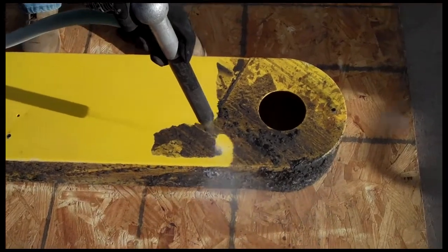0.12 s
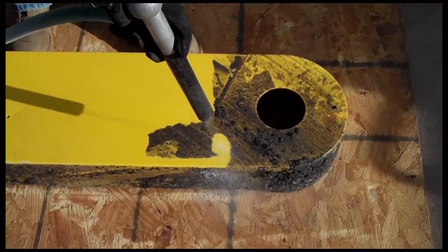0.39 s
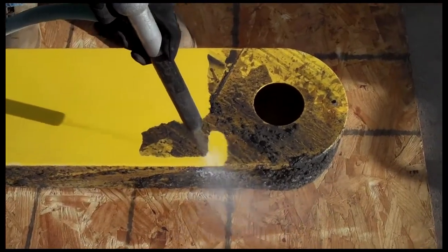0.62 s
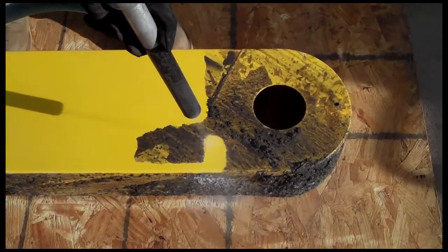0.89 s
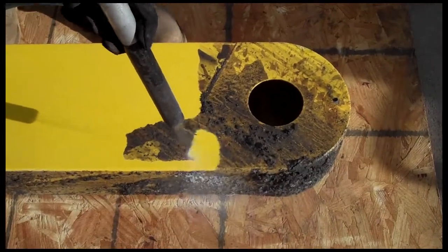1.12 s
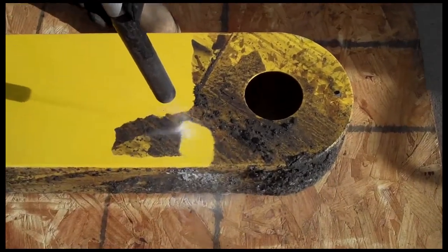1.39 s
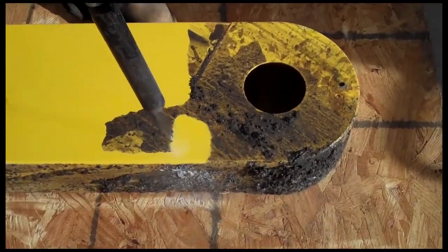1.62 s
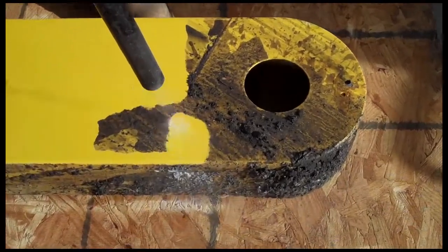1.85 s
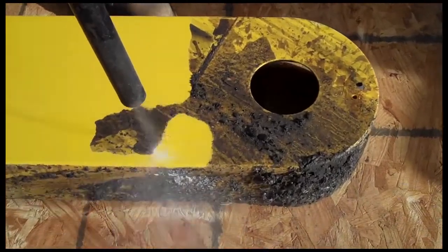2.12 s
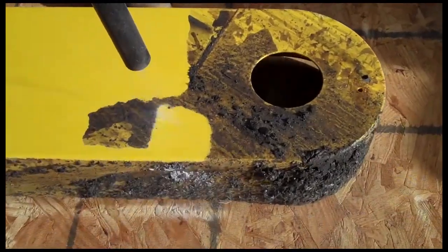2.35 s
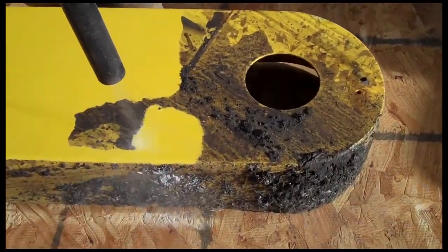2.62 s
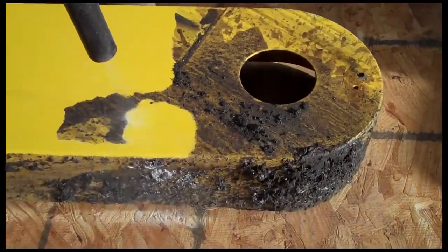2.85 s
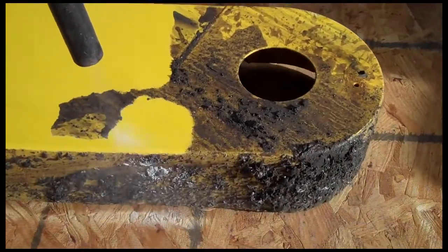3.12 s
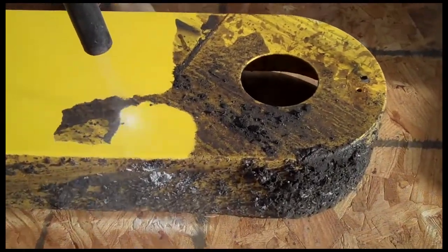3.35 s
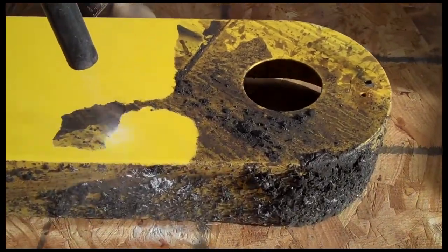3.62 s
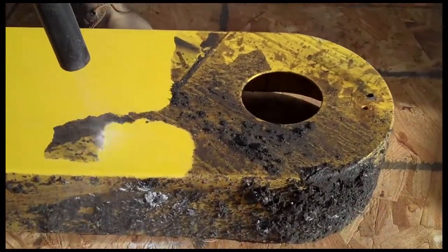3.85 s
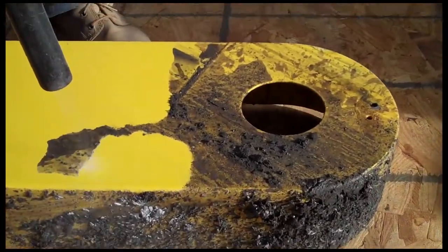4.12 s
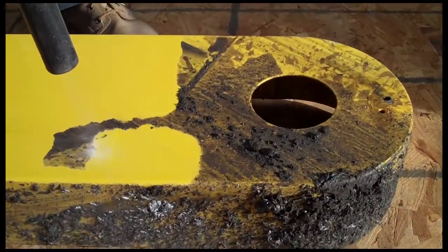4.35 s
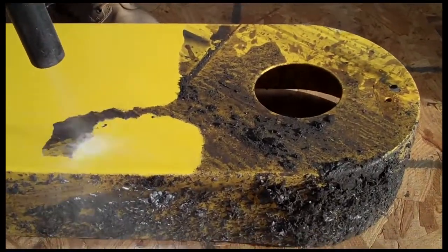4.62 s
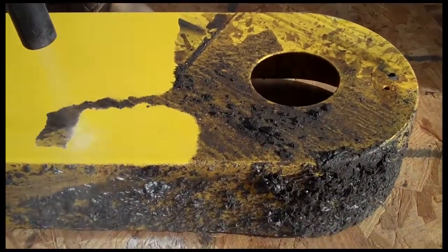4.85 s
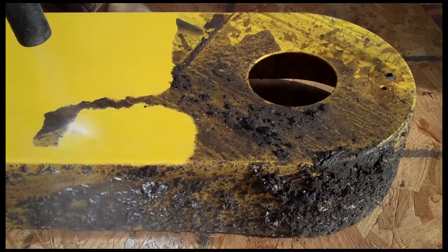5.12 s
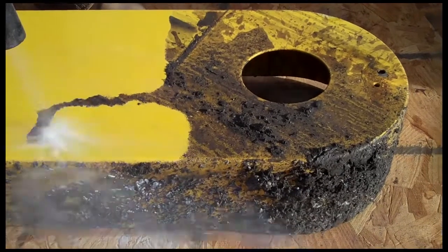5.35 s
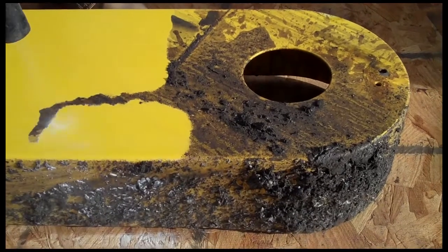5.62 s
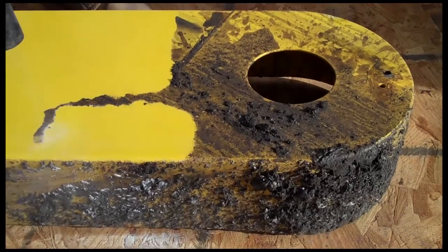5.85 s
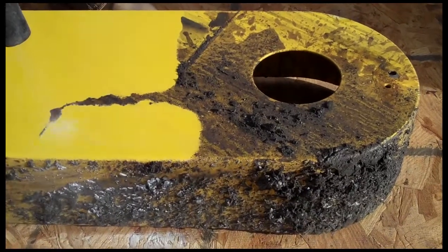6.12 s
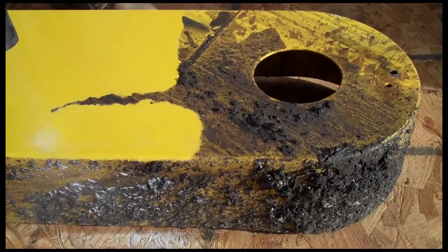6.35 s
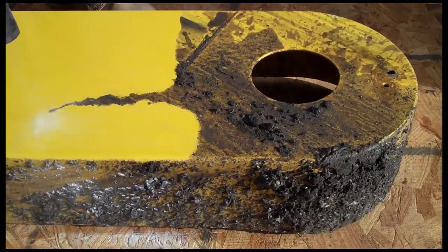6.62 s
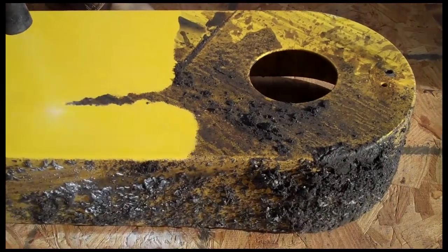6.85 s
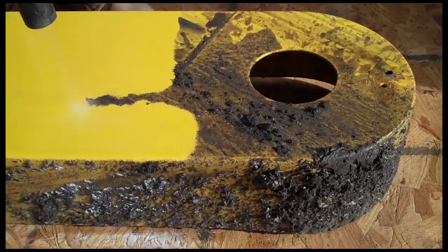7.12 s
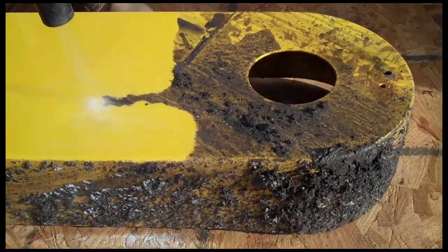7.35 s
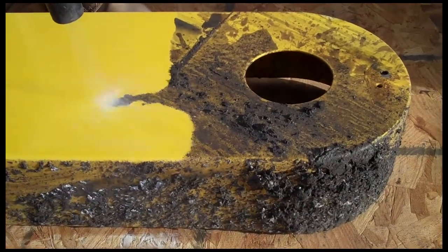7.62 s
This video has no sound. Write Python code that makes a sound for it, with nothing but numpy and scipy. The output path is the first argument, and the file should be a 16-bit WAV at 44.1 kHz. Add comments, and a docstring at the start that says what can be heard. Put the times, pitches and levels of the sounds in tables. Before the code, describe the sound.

A loud, unbroken dry ice blasting hiss roars in a workshop, pulsing about twice a second as pellets drum a ringing steel part.

```python
"""In a workshop, a hand-held nozzle blasts air and dry ice pellets at a steel part, sweeping about twice a second.
The jet is shaped noise that hisses; the pellets are random blows that drum on three resonances of the steel.
The walls return a wide roar, made of noise nearly unrelated at the two ports.
The nozzle drifts to the left of a close pair of microphone ports and eases back a little at the end."""
import sys
import numpy as np
from scipy import signal
from scipy.fft import rfft, irfft
from scipy.io import wavfile
from scipy.ndimage import uniform_filter1d, map_coordinates

SR = 44100
rng = np.random.default_rng(int(sys.argv[2]) if len(sys.argv) > 2 else 0)


def generate_wav(signal):
    """Clip the signal to [-1, 1] and save it as 16-bit WAV at the path in sys.argv[1]."""
    frames = np.transpose(np.atleast_2d(signal))
    scaled = np.clip(frames, -1, 1) * 32767
    pcm = np.round(scaled).astype(np.int16)
    wavfile.write(sys.argv[1], SR, pcm)


def ratio_of_db(decibels):
    """Turn decibels (scalar or array-like) into linear amplitude factors; 0 dB maps to 1."""
    return 10 ** (np.asarray(decibels, float) / 20)


N = 340893

# The nozzle's drift: start_s, left_lead_us, jet_brightness_db_per_octave, jet_level_db,
# jet_rise_in_pass_db, room_level_db
NOZZLE_DRIFT = [(0, -4, 2, -16, -0.5, -14), (0.7, -1, 1.5, -15, -1.5, -13), (2, 8.5, 0.6, -15, 0, -14.5),
                (3, 15, 0.2, -15.5, 0.2, -14.5), (4.2, 23.5, -0.1, -16, 2.3, -14.5),
                (5.3, 28, -0.2, -16.5, 0.5, -14.5), (6.3, 29.5, -0.8, -16, 0.5, -14.5),
                (6.9, 31, 0.1, -16.5, -2, -15), (7.3, 27, 0, -14.5, -1.8, -15),
                (7.73, 25, 2.5, -16, -0.5, -14)]
# Colour of the jet's hiss: freq_hz, relative_level_db (per Hz)
JET_SPECTRUM = [(300, -32), (1000, -14), (2000, -3.5), (3500, 2.5), (5000, 0), (6500, -2.5), (8000, -3.5),
                (10500, -7), (12000, -15.5), (14000, -22.5)]
# Colour of the room's roar: freq_hz, relative_level_db (per Hz)
ROAR_SPECTRUM = [(25, -39), (60, -13.5), (150, -9), (400, -1.5), (1000, 1), (2000, 1), (3500, 0), (5000, 0),
                 (7000, -4), (9000, -12.5), (10500, -22.5), (14500, -25)]
# Lower, upper and middle ring of the steel: pitch_hz, width_hz (of one of two equal filters in a row)
STEEL_RINGS = [(3190, 1470), (4510, 810), (4040, 470)]
# The solid body between the ports: freq_hz, left_phase_lead_rad, left_minus_right_db
PORT_BODY = [(1000, -2, 4), (3080, 0.76, 1.5), (4180, -0.13, 2.3), (6500, 0, -6), (7840, .5, -4),
             (9930, 1.4, -6.5), (11300, 1.97, -2.5), (14600, 2, 12.5)]
# Passes over the crusted spot: middle_s, length_s, lower_ring_db, upper_ring_db, middle_ring_db
PASSES = [(0.055, 0.2, -16, -30, -27), (0.26, 0.71, -16.5, -16.5, -35), (0.71, 0.55, -14, -12.5, -24),
          (1.185, 0.49, -17.5, -17, -20), (1.677, .56, -17, -16.5, -22), (2.13, 0.41, -15, -15, -21),
          (2.627, 0.51, -19.5, -20.5, -23.5), (3.08, 0.27, -20, -28, -22), (3.553, 0.64, -20, -33, -26),
          (4.045, 0.52, -19.5, -25, -22.5), (4.57, .45, -20.5, -21, -21), (4.98, 0.7, -20, -25, -27),
          (5.46, 0.4, -21, -22, -21), (5.973, 0.37, -21, -22, -25), (6.434, .3, -19, -25, -31),
          (6.617, .25, -19, -19, -27), (7.13, 0.55, -36, -29, -32), (7.46, .4, -19.5, -20.5, -25)]
# The patter between passes, one value for each steel ring: level_db
PATTER_DB = [-28, -26, -35]
# How long after the middle of a pass each steel ring peaks (negative is before): lag_s
RING_LAG_S = [0.0067, -0.0089, .015]
# Share of a pass's length over which each steel ring swells: span (ratio)
RING_SPAN = [1.07, 0.83, 0.99]

PELLETS_PER_S = 9000
RING_FLICKER_DB, FLICKERS_PER_S = 0.64, 14
# Left minus right level, and its change with the left port's lead
DIRECT_PAN_DB, DIRECT_PAN_DB_PER_US = 2, -0.0648
ROOM_PAN_DB, ROOM_PAN_DB_PER_US = 2.8, -0.08
# A band of the direct sound, slightly weak at first, that grows into a lift as the nozzle drifts left
BAND_LIFT_HZ, BAND_LIFT_WIDTH_HZ, BAND_LIFT_DB, BAND_LIFT_DB_PER_US = 5800, 750, -1.5, 0.1074
ROAR_SWELL_DB = 0.82  # the room's rise in a pass
# The whole blast sputters, more as the nozzle drifts left
SPUTTER_DB, SPUTTER_DB_PER_US, SPUTTERS_PER_S = 0.17, 0.0188, 28
FRAME = 512  # samples in a spectral frame
TOP_HZ, BASS_CUT_HZ = 14200, 34


def jet():
    """Turbulent mixing noise of the air jet, brighter when it points nearer."""
    jet_db, rise_db = curves(NOZZLE_DRIFT, np.arange(N) / SR)[2:4]
    hiss_db = jet_db + rise_db * swells().sum(axis=0)

    def colour(hz, t):
        brightness = curves(NOZZLE_DRIFT, t)[1]
        tilt = ratio_of_db(brightness * np.log2((hz + 500) / 6500))
        return ratio_of_db(along(JET_SPECTRUM, hz)[0]) * tilt * patches(hz, t, patchy_db=0.82)

    hiss = unit(reshaped(rng.standard_normal(N), colour))
    return ratio_of_db(hiss_db + 0.38 * wobble(25)) * hiss


def pellets():
    """A dense hail of tiny blows, arriving in clumps, drives three broad resonances of the steel."""
    hit = rng.random(N) < PELLETS_PER_S / SR
    clumps = ratio_of_db(0.5 * wobble(20) + 0.8 * wobble(50))
    hail_spectrum = rfft(hit * rng.standard_normal(N) * clumps)
    hz = np.fft.rfftfreq(N, 1 / SR)
    rings = []
    for pitch_hz, width_hz in STEEL_RINGS:
        damping = 1j * hz * width_hz
        resonance = damping / (pitch_hz ** 2 - hz ** 2 + damping)
        rings.append(unit(irfft(hail_spectrum * resonance ** 2, N)))
    flicker = np.array([wobble(FLICKERS_PER_S) for _ in STEEL_RINGS])
    ring_db = drumming_db() + RING_FLICKER_DB * flicker
    return np.sum(ratio_of_db(ring_db) * rings, axis=0)


def drumming_db():
    """Level of each steel ring: the passes swell over a steady patter, added as power."""
    peaks_db = np.transpose(PASSES)[2:]
    power = []
    for patter_db, peak_db, lag_s, span in zip(PATTER_DB, peaks_db, RING_LAG_S, RING_SPAN):
        power.append(ratio_of_db(2 * patter_db) + ratio_of_db(2 * peak_db) @ swells(lag_s, span))
    return 10 * np.log10(power)


def at_ports(direct):
    """A direct sound reaches the two ports with a lead and a level difference, half on each side."""
    def gains(hz, t):
        lead_us = curves(NOZZLE_DRIFT, t)[0]
        pan_db = DIRECT_PAN_DB + DIRECT_PAN_DB_PER_US * lead_us
        body_phase, body_db = along(PORT_BODY, hz)
        phase = body_phase + 2 * np.pi * hz * lead_us / 1e6
        left = ratio_of_db((pan_db + body_db) / 2) * np.exp(0.5j * phase)
        band = np.exp(-((hz - BAND_LIFT_HZ) / BAND_LIFT_WIDTH_HZ) ** 2)
        band_lift = ratio_of_db((BAND_LIFT_DB + BAND_LIFT_DB_PER_US * lead_us) * band)
        return band_lift * np.array([left, 1 / left])

    return reshaped(direct, gains)


def room():
    """The walls return the blast from all sides: nearly unrelated at the two ports."""
    lead_us, *_, steady_db = curves(NOZZLE_DRIFT, np.arange(N) / SR)
    roar_db = steady_db + ROAR_SWELL_DB * swells().sum(axis=0) + 0.13 * wobble(8)
    pan_db = ROOM_PAN_DB + ROOM_PAN_DB_PER_US * lead_us
    # each port has its own noise, plus a little that both share
    noise = rng.standard_normal((2, N)) + 0.42 * rng.standard_normal(N)

    def colour(hz, t):
        return ratio_of_db(along(ROAR_SPECTRUM, hz)[0]) * patches(hz, t, patchy_db=0.5)

    roar = unit(reshaped(noise, colour))
    return ratio_of_db(roar_db + np.outer([0.5, -0.5], pan_db)) * roar


def swells(lag_s=0, span=1):
    """One raised cosine, 0 to 1, for every pass."""
    middle_s, length_s = np.transpose(PASSES)[:2, :, None]
    position = (np.arange(N) / SR - lag_s - middle_s) / (span * length_s)
    return np.cos(np.pi * np.clip(position, -0.5, 0.5)) ** 2


def patches(hz, t, patchy_db):
    """Turbulence: random gain, smooth over some hundred Hz and some ten ms."""
    field = rng.standard_normal((len(hz), len(t)))
    field = uniform_filter1d(field, size=7, axis=0)
    field = uniform_filter1d(field, size=20, axis=1)
    return ratio_of_db(patchy_db * unit(field))


def wobble(rate):
    """A smooth random curve, rate knots a second."""
    knots = rng.standard_normal(int(N * rate / SR) + 4)
    return map_coordinates(knots, [np.arange(N) * rate / SR])


def reshaped(x, gain):
    """x times a gain, real or complex, of frequency (column) and time (row)."""
    overlap = FRAME * 3 // 4
    hz, t, z = signal.stft(x, SR, nperseg=FRAME, noverlap=overlap)
    return signal.istft(z * gain(hz[:, None], t), SR, nperseg=FRAME, noverlap=overlap)[1][..., :N]


def along(points, hz):
    """Columns after the frequency, read at hz on a log axis."""
    f, *columns = np.transpose(points)
    return [np.interp(np.log(hz + 1), np.log(f + 1), column) for column in columns]


def curves(rows, t):
    """Columns after the time, read at times t."""
    s, *columns = np.transpose(rows)
    return [np.interp(t, s, column) for column in columns]


def unit(x):
    """Bring to rms 1."""
    return x / np.sqrt(np.mean(np.abs(x) ** 2) + 1e-20)


def scene():
    """Direct jet and pellets in the roar of the room; the feed sputters."""
    lead_us = curves(NOZZLE_DRIFT, np.arange(N) / SR)[0]
    sputter_db = (SPUTTER_DB + SPUTTER_DB_PER_US * lead_us) * wobble(SPUTTERS_PER_S)
    blast = at_ports(jet() + pellets()) + room()
    return ratio_of_db(sputter_db) * blast


def top_cut(x):
    """Nothing passes above the cut-off."""
    return signal.sosfilt(signal.butter(12, 14560, fs=SR, output="sos"), x)


def record(dry):
    """The microphone rounds off the loudest peaks, loses the deepest bass and stops at its band limit."""
    hz = np.fft.rfftfreq(N, 1 / SR)
    rounded = dry / (1 + np.abs(dry / 1.01) ** 5) ** (1 / 5)
    band = (hz < TOP_HZ) * hz / np.hypot(hz, BASS_CUT_HZ)
    mix = irfft(rfft(rounded) * band, N)
    return top_cut(mix)


dry = scene()
out = record(dry)
generate_wav(out)
```